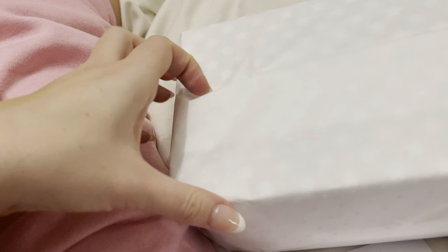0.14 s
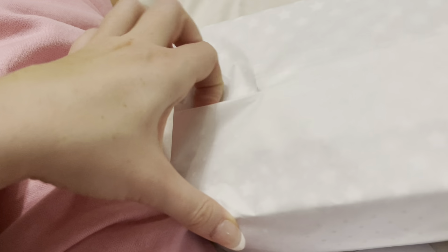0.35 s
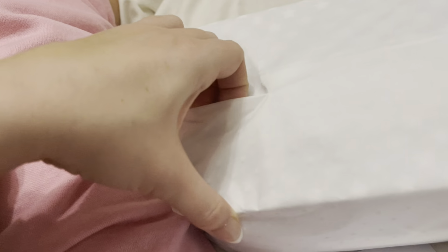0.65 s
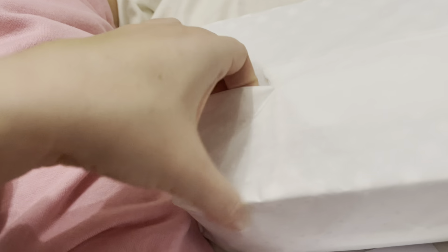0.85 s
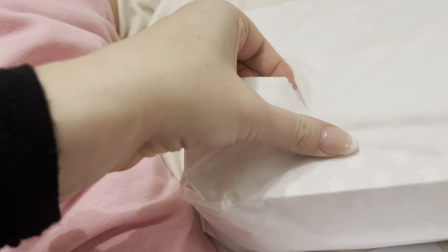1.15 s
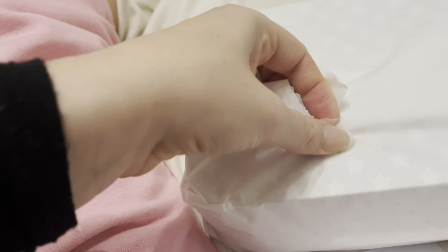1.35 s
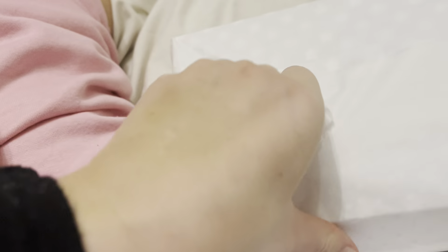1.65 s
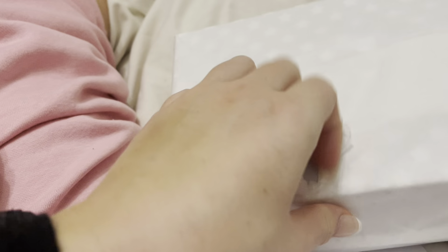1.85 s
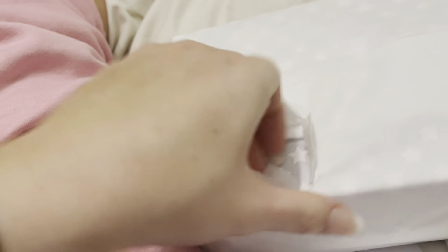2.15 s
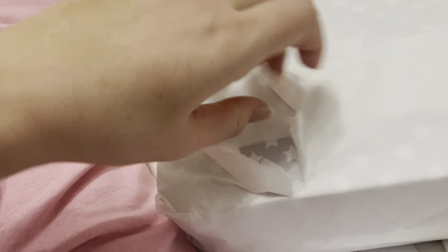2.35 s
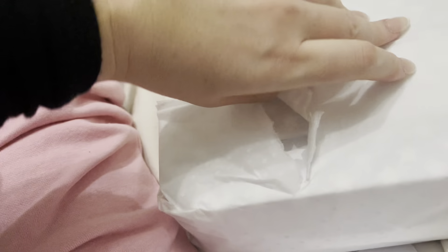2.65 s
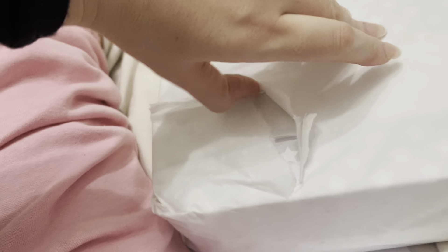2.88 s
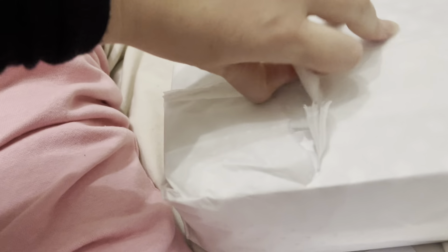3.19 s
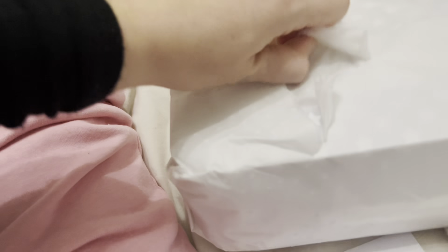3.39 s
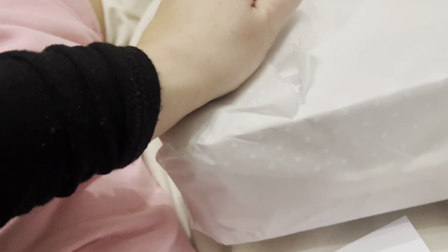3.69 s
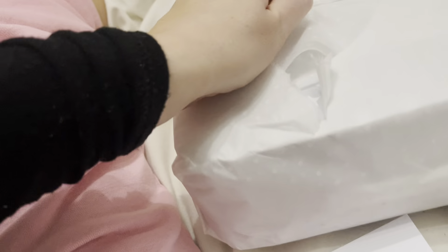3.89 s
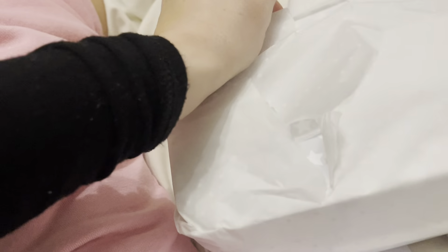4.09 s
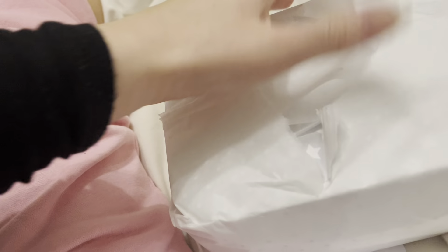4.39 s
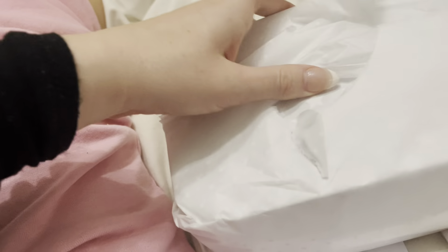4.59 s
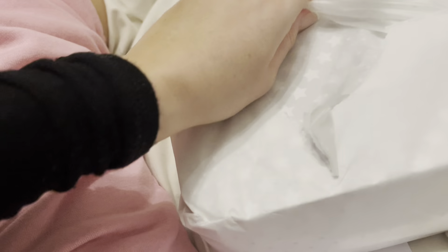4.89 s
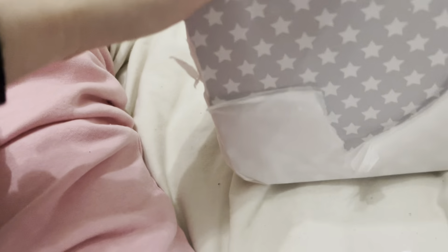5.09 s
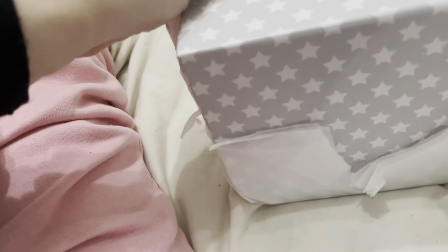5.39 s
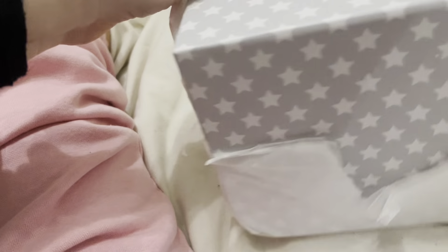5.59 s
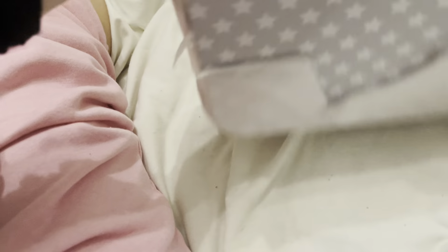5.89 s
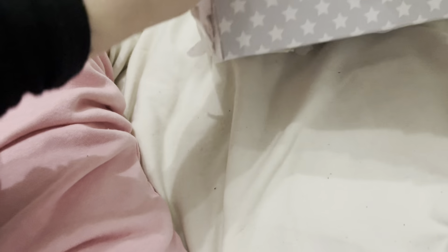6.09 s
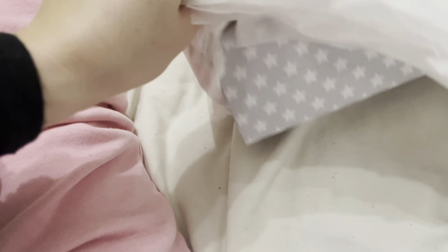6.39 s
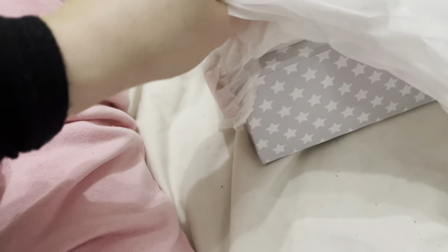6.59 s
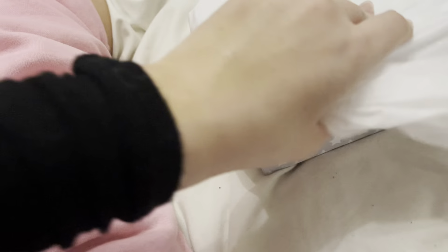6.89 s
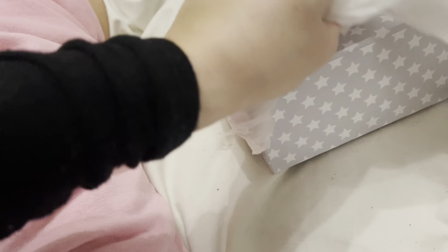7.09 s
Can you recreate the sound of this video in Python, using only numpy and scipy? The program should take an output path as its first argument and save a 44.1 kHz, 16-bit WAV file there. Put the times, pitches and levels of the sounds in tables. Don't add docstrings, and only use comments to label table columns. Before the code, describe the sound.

Very close to the microphone in a quiet, soft-furnished room, fingertips pinch thin, taut tissue paper with dry snaps and light taps on a hollow box. An edge tears in stronger bursts, then the whole hand rips the sheet and pulls it away in dense, rustling sweeps. Dull low thumps and bumps of the box on bedding continue underneath. Bright, crackly stereo, almost no echo.

```python
import sys
import numpy as np
from scipy import signal
from scipy.fft import rfft, irfft
from scipy.io import wavfile
from scipy.ndimage import uniform_filter1d

SR = 44100
rng = np.random.default_rng(int(sys.argv[2]) if len(sys.argv) > 2 else 0)


def gain_from_db(level_db):
    decades = np.asarray(level_db, float) / 20
    return 10 ** decades


def bounce(signal):
    frames = np.transpose(np.atleast_2d(signal))
    limited = np.clip(frames, -1, 1)
    pcm = np.round(limited * 32767).astype(np.int16)
    wavfile.write(sys.argv[1], SR, pcm)


N = 319725


def evened(x):
    return x / np.sqrt(np.mean(x ** 2) + 1e-20)


def read(points, hz):
    point_hz, value = np.transpose(points)
    return np.interp(np.log(hz + 1), np.log(point_hz + 1), value)


def follow(rows, s):
    times, *columns = np.transpose(rows)
    return [np.interp(s, times, column) for column in columns]


def slow(rate_hz):
    return evened(signal.lfilter(*signal.butter(2, rate_hz, fs=SR), rng.standard_normal(N)))


def colour(x, points):
    gain_db = np.maximum(read(points, np.fft.rfftfreq(4096, 1 / SR)), -100)
    log_gain = np.log(gain_from_db(gain_db))
    full = np.r_[log_gain, log_gain[-2:0:-1]]
    taps = np.fft.ifft(np.exp(full - 1j * signal.hilbert(full).imag)).real[:2048]
    return signal.oaconvolve(x, taps[None] / np.linalg.norm(taps), axes=1)[:, :N]


def ring(x, hz, width_hz):
    return signal.lfilter(*signal.iirpeak(hz, hz / width_hz, SR), x)


def resonate(x, hz, width_hz):
    turn = np.exp(2j * np.pi * np.cumsum(hz) / SR)
    r = np.exp(-np.pi * width_hz / SR)
    return 2 * (turn * signal.lfilter([1 - r], [1, -r], x / turn)).real


# frequency in Hz, level in dB per Hz.
ROOM_TONE_SPECTRUM = [(22, -25), (42, 0.5), (274, -3.5), (645, -12.5), (1440, -14), (1970, -25),
                      (4650, -20), (11300, -59.5), (15000, -67)]


def room_tone():
    return gain_from_db(-54) * colour(rng.standard_normal((2, N)), ROOM_TONE_SPECTRUM)


def room(x):
    t = np.arange(6000) / SR
    echoes = rng.choice([-1., 1.], (2, 6000)) * (rng.random((2, 6000)) < .05)
    taps = echoes * gain_from_db(-60 * t / 0.047) * (t > .003)
    taps = signal.lfilter(*signal.butter(1, 6000, fs=SR), taps)
    return signal.oaconvolve(x, taps / np.linalg.norm(taps[0]), axes=1)[:, :N]


# frequency in Hz, width in Hz, level in dB.
WALL_MODES = [(177.6, 110, -2.5), (370, 182, -2), (547, 196, -1)]
# time in seconds, drumming in dB, hollow note relative to it in dB,
# shifting on the bed in dB.
BOX_DRIVE = [
    (0, -15, 9, -24.5),
    (.85, -17.5, 12, -13.5),
    (1.9, -13, 7.5, -20),
    (2.5, -14, -2, -16),
    (3.1, -11.5, 0.5, -33),
    (3.7, -19, 3, -14.5),
    (4.2, -13, -13, -22),
    (4.5, -21, 5, -18),
    (5.5, -13.5, -29, -11.5),
    (7.25, -13, -0.5, -18),
]


def box(push):
    drum_db, hollow_db, shift_db = follow(BOX_DRIVE, np.arange(N) / SR)
    walls = 0
    for k, (hz, width_hz, db) in enumerate(WALL_MODES):
        walls = walls + (-1) ** k * gain_from_db(db) * ring(ring(push, hz, 1.16 * width_hz), hz, 1.2 * width_hz)
    hollow = ring(ring(push, 234.0, 66), 234.0, 66)
    weight = np.sign(push) * abs(push) ** 0.56
    thud = ring(ring(weight * gain_from_db(4.3 * slow(11.0)), 110, 180), 110, 180)
    return gain_from_db(drum_db - 12.0) * (walls + gain_from_db(hollow_db) * hollow) + gain_from_db(shift_db - 5.0) * thud


# time in seconds, peak in dB, length in ms.
LID_TAPS = [(0.083, -35.5, 24), (0.19, -26, 4.3), (0.294, -27, 13), (0.523, -32, 17), (.657, -33.5, 33),
            (1.003, -24.5, 22), (1.047, -22, 15), (1.099, -23, 16), (1.168, -21, 13.5), (1.195, -19, 15.5),
            (1.237, -24.5, 19), (1.296, -34, 69), (1.463, -28.5, 18), (1.492, -33, 17), (1.623, -22.5, 14),
            (1.771, -33, 17), (2.001, -38, 59), (2.333, -23.5, 4.7), (2.393, -28.5, 24), (2.433, -35, 22),
            (2.462, -32, 20), (2.483, -32, 22), (2.505, -32, 35), (2.554, -31, 18), (2.599, -34.5, 15),
            (2.663, -36, 19), (2.806, -33.5, 45), (2.932, -35.5, 20)]
# time in seconds, peak in dB, pitch in Hz, length in ms.
BOX_BUMPS = [(.506, -32.5, 725, 4.9), (1.878, -38.5, 450, 57), (1.896, -38.5, 1130, 18),
             (2.015, -41, 1110, 16), (2.175, -35, 457, 18), (2.25, -41, 604, 26), (2.53, -44, 517, 21),
             (2.81, -39, 551, 60), (3.308, -27, 272, 24), (4.169, -44, 668, 88), (4.207, -38.5, 470, 37),
             (4.535, -25, 274, 19), (4.656, -26, 257, 31), (4.747, -24.5, 203, 33), (4.802, -27, 252, 17),
             (4.927, -26, 432, 22), (5.128, -30.5, 254, 22), (5.19, -27.5, 1200, 10),
             (5.291, -23.5, 242, 23), (5.444, -30, 227, 13), (5.694, -30.5, 376, 38), (6.271, -25, 370, 21),
             (6.92, -37, 270, 34), (7.137, -26.5, 280, 5.4), (7.196, -23.5, 286, 8.3)]
TAP_HZ, TAP_SAG_HZ_PER_DB, TAP_SOFT_DB = 251.5, 2.5, -34


def thumps():
    t = np.arange(4000) / SR
    out = np.zeros((2, N + 4000))
    taps = [(s, db, TAP_HZ - TAP_SAG_HZ_PER_DB * (db - TAP_SOFT_DB), ms) for s, db, ms in LID_TAPS]
    rows = taps + BOX_BUMPS
    for (s, db, hz, length_ms), noise in zip(rows, rng.standard_normal((len(rows), 2, 4000))):
        u = t * 1000 / (0.31 * length_ms)
        at = round((s - .002) * SR)
        tone = np.sin(2 * np.pi * hz * t + 3 * noise[:, :1]) * (u * np.exp(1 - u)) ** 2.76
        scuff = ring(noise, 413, 173) * np.sqrt(length_ms / 15) * np.sqrt(u) * np.exp(-u / 1.22)
        out[:, at:at + 4000] += gain_from_db(db + 5.0) * (tone + 5.76 * scuff)
    return out[:, :N]


# frequency in Hz, level in dB.
FINE_SPECTRUM = [(4000, -44), (6200, -23.5), (7500, -5), (9000, -3), (10000, -1), (10650, 3), (11300, -0.5),
                 (12000, -10.5), (13000, -14.5), (13700, -25), (15200, -23)]


def crisp(fine):
    return colour(fine, FINE_SPECTRUM)


# frequency in Hz, level in dB.
FOLD_SPECTRUM = [(400, -16.5), (780, -7.5), (1150, -1.5), (1550, -6), (2000, -4.5), (2450, -2), (3100, -1),
                 (4500, -2.5), (5600, 1), (7000, -1), (9000, -55.5)]


def papery(broad):
    return colour(broad, FOLD_SPECTRUM)


GRAIN = 900


def creases(length_ms, hz, facet):
    noise = rng.standard_normal((len(hz), 2, 2, GRAIN))
    stutter = evened(uniform_filter1d(noise[:, :1, :1, ::-1], size=45))
    noise = noise * gain_from_db(4.0 * stutter)
    u = np.arange(GRAIN) / SR * 1000 / length_ms[:, None, None]
    fine = noise[:, 0] * np.exp(-(u / 1.07) ** 0.99) * (1 - np.exp(-u / 0.31))
    broad = noise[:, 1] * np.exp(-(u / 1.48) ** 1.23) * (1 - np.exp(-u / 0.41))
    small_hz = rng.uniform(5960, 13560, len(hz))
    small_facets = np.array([ring(a, f, f / 4) for a, f in zip(fine, small_hz)])
    large_facets = np.array([ring(b, f, f / 3.5) for b, f in zip(broad, hz)])
    return .8 * fine + small_facets, .4 * broad + facet * large_facets


def swarm(per_s, spread_db, clump_db, clump_hz, length_ms):
    lengths_ms = length_ms * 3.5 ** rng.random(12)
    fold_hz = rng.permutation(np.geomspace(900, 6200, num=12))
    shapes = creases(lengths_ms, fold_hz, facet=0.95)
    clumps = slow(clump_hz)
    clumps = evened(clumps - uniform_filter1d(clumps, size=2500))
    size_db = spread_db * rng.exponential(1, N) + clump_db * clumps
    size = gain_from_db(np.minimum(size_db, 11))
    clicks = size * (rng.random(N) < per_s / SR) * rng.choice([-1., 1.], (2, N))
    kind = rng.integers(0, 12, N)
    sums = []
    for shape in shapes:
        sums.append(sum(signal.oaconvolve(clicks * (kind == k), burst, axes=1)[:, :N]
                        for k, burst in enumerate(shape)))
    return [evened(x) for x in (*sums, clicks)]


# peak time in seconds,
# crumpling in dB, swell in ms, release in ms.
HAND_STROKES = [(0.0, -51, 12, 120), (.1, -36, 45, 104), (.18, -35.5, 55, 350), (0.288, -31.5, 130, 270),
                (.479, -34, 155, 184), (0.652, -33.5, 156, 115), (0.702, -38, 22, 580),
                (1.046, -35, 410, 410), (1.133, -25, 64, 84), (1.201, -28.5, 64, 54),
                (1.245, -33, 140, 320), (1.42, -40.5, 190, 175), (1.539, -34.5, 60, 100),
                (1.628, -17.5, 84, 106), (1.8, -38.5, 280, 530), (2.119, -33, 136, 260),
                (2.249, -37, 49, 270), (2.323, -34.5, 390, 81), (2.527, -33.5, 330, 94),
                (2.662, -37, 150, 440), (2.785, -34, 28, 160), (2.941, -39, 160, 630),
                (3.14, -25.5, 17, 176), (3.204, -27.5, 210, 33), (3.335, -20, 150, 93),
                (3.445, -30, 120, 270), (3.499, -21.5, 42, 112), (3.57, -32.5, 54, 220),
                (3.7, -38, 1300, 91), (3.799, -38, 80, 630), (3.852, -30, 62, 41), (3.98, -20, 65, 170),
                (4.024, -20, 182, 116), (4.213, -36.5, 69, 210), (4.42, -39, 190, 220),
                (4.548, -20.5, 103, 64), (4.658, -19, 52, 170), (4.69, -21, 80, 70), (4.773, -19, 117, 56),
                (4.82, -23.5, 86, 69), (4.951, -26.5, 1200, 19), (4.992, -29, 30, 110),
                (5.125, -27.5, 226, 850), (5.301, -27.5, 220, 340), (5.444, -32, 250, 140),
                (5.574, -32, 130, 74), (5.624, -27.5, 12, 300), (5.695, -25, 210, 75),
                (5.755, -36, 100, 63), (5.951, -36.5, 65, 470), (6.081, -30, 320, 65),
                (6.274, -25, 204, 210), (6.441, -21, 235, 96), (6.7, -33.5, 420, 2000),
                (6.914, -25.5, 270, 370), (7.116, -26, 430, 290)]
REST_DB = -54


def hand(t):
    pull = np.full(len(t), 10 ** (REST_DB / 50))
    for s, db, swell_ms, release_ms in HAND_STROKES:
        shape = np.interp(t, [s - swell_ms / 1000, s, s + release_ms / 1000], [0, 1, 0])
        pull = np.maximum(pull, 10 ** (db / 50) * shape)
    return 50 * np.log10(pull)


# time in seconds, pitch of its broad folds in Hz,
# broad folds relative level in dB, crackle share 0-1.
SHEET_IN_PLAY = [(0, 5130, -1, 0.76), (.8, 4300, 2, 0.91), (1.1, 3100, 1.5, 0.85), (1.65, 3160, -2, 0.8),
                 (1.95, 2680, -3.5, 0.23), (2.45, 5030, -1.5, 0.81), (3.15, 4770, -5, 0.94),
                 (3.5, 2800, -2, 0.86), (4.0, 3700, 0, 0.58), (4.3, 3600, -1.5, 0.77),
                 (4.9, 3580, -2.5, 0.55), (5.15, 1220, -2.5, 0.49), (5.82, 1190, -1.5, 0.55),
                 (6.2, 3600, 1, 0.26), (6.43, 3080, -2, 0.4), (6.65, 2230, -1, 0.3), (7.25, 2140, -1, 0.67)]


def rustle():
    t = np.arange(N) / SR
    work_db = hand(t)
    fold_hz, fold_db, share = follow(SHEET_IN_PLAY, t)
    share = np.clip(share, 0, 1)
    crackle = swarm(per_s=700, spread_db=3.0, clump_db=4.5, clump_hz=60.5, length_ms=0.5)
    hiss = swarm(per_s=5000, spread_db=-0.5, clump_db=1.06, clump_hz=44, length_ms=0.32)
    fine, broad, push = (share * a + np.sqrt(1 - share ** 2) * b for a, b in zip(crackle, hiss))
    broad = broad + .9 * resonate(broad, fold_hz * 1.18 ** slow(7), 1300)
    taut = np.clip((fold_hz - 2200) / 4500, 0, 1)
    broad = broad - taut * signal.lfilter(*signal.butter(1, 1800, fs=SR), broad)
    push_gain = gain_from_db(0.79 * (work_db + 37.5))
    return gain_from_db(work_db + 6.0) * fine, gain_from_db(work_db + fold_db) * broad, push_gain * push


# time
# in seconds, peak in dB, broad folds relative level in dB, fold pitch in Hz, length in ms.
CRACKS = [(0.0076, -27.5, -3.5, 4740, 3.9), (0.083, -11, -8, 3520, 2.7),
          (0.113, -10, -7.5, 4870, 2.5), (0.1437, -13.5, -9, 6120, 0.66),
          (0.161, -15, -13, 5250, 2.6), (0.1695, -8, -15, 4930, 2.7), (0.187, -3, -10.5, 4200, 1.06),
          (0.198, -14, -4, 5160, 2), (0.2227, -16, -4, 5000, 3.5), (0.24, -8, -8, 5040, 1.9),
          (0.256, -7.5, -12, 5060, 4.4), (0.29, -11, -3.5, 6480, 3.9), (0.318, -6.5, -9, 6160, 8),
          (0.3409, -9.5, -5.5, 4970, 6.7), (0.3728, -13.5, -2, 4740, 0.98),
          (0.374, -11.5, -6.5, 6480, 2.5), (0.407, -19, -7, 4240, 1.5), (0.5216, -15.5, 0, 5060, 2.2),
          (0.5626, -18, -7, 3230, 1.7), (0.5929, -18.5, 0.5, 4240, 3), (0.599, -16.5, 1, 5060, 1),
          (0.6378, -13, -3, 4010, 0.83), (0.6545, -4.5, -5.5, 4530, 4.6),
          (0.729, -8.5, -5.5, 4900, 1.16), (0.7806, -19, 9.5, 5030, 0.47),
          (0.8282, -19, -12, 5380, 1.9), (0.8377, -15, -12, 5660, 1), (0.8765, -14.5, -5, 4870, 1.05),
          (0.9435, -8.5, -7.5, 2970, 0.73), (0.949, -15, -10, 2710, 2.7),
          (0.996, -2.5, 0, 3100, 1.4), (1.0005, -4, -10, 4000, 1.8), (1.0453, -2.5, -1, 3120, 3.2),
               (1.0717, -21, 5, 3430, 1), (1.1017, -6.5, -3, 3060, 2.8), (1.137, -7, 1, 3050, 3),
               (1.193, -1.5, -10, 5800, 4.1), (1.2026, -8, -19, 5940, 2.2), (1.24, 0.5, -12, 4820, 2.2),
               (1.379, -16, -9, 6480, 1.7), (1.4051, -16, -22, 6480, 4.3), (1.4221, -13, -3, 4330, 1.7),
               (1.433, -14.5, -8, 3600, 1.5), (1.5963, -2, -4, 4130, 4.4), (1.6225, -7.5, 1, 1950, 3.9),
               (1.7828, -10, -13.5, 2650, 1.4), (1.8149, -12, -21, 3680, 2.2), (1.871, -14, -20, 3660, 1.2),
               (1.8893, -4.5, -17, 3810, 0.7), (1.997, -24, -10, 900, 1.3), (2.062, -18, -12.0, 6140, 1.1),
               (2.0677, -15.5, -13, 5340, 0.62), (2.095, -10, -13, 5990, 2.8),
               (2.1246, -13, -6.5, 5620, 5.4), (2.162, -9, -9.0, 4310, 1.8), (2.177, -6, -13, 5450, 1.8),
               (2.2508, -10.5, -8, 900, 1.6), (2.3115, -10, -4.5, 5200, 1.5),
               (2.3873, -16.5, -7, 2870, 3.6), (2.448, -11, -29, 4740, 1.4), (2.512, -6.5, -27, 5300, 1.7),
               (2.531, -13, -19, 6480, 1.4), (2.6566, -9.5, -10, 5340, 8.3), (2.7876, -22, -0.5, 4370, 1.6),
          (2.978, -16.5, -7, 5730, 0.99), (2.9892, -15, -21, 6460, 1), (3.016, -19, -14, 5940, 1.5),
              (3.023, -15.5, -11, 4460, 2), (3.0697, -18, -16, 5600, 1.5), (3.0749, -13, -14, 5250, 0.63),
              (3.128, -1, -16.5, 3900, 1.1), (3.1382, -8, -23, 5000, 1), (3.164, -1, -19, 4430, 1.8),
              (3.1858, -0.5, -18, 4000, 0.52), (3.2759, -4.5, -12, 5100, 1.9), (3.2797, -11, -9, 5530, 2.2),
              (3.3088, 0, -9.5, 3900, 5.8), (3.3291, -10, -8, 3860, 1), (3.3498, -3, -3.5, 3700, 2.55),
              (3.3666, -3, -12.5, 4480, 1.28), (3.411, -11.5, -10.5, 2820, 1.3), (3.5, -1, -10, 3730, 2.1),
              (3.6826, -17, -15, 4260, 2.2), (3.7078, -22, -9, 970, 5), (3.7188, -16, -5, 3780, 0.88),
              (3.7784, -13, -7.0, 1750, 0.72), (3.8468, -13, -17, 6400, 3.2),
              (3.9044, -8.5, -6.5, 2770, 1.6), (3.9105, -6, -4.5, 2050, 0.62), (3.9738, -4, -5, 3820, 4.8),
              (4.0014, 1, -4, 2230, 2.3), (4.163, -19, -7.5, 5750, 2.3), (4.1998, -16, -14.0, 5200, 2.2),
              (4.2135, -19, -4, 1990, 1.8), (4.263, -19.5, -0.5, 2460, 4.2), (4.314, -14, -15, 2710, 1.4),
              (4.3382, -15, -7, 1910, 1.14), (4.387, -23, -6, 3000, 1), (4.4251, -14.5, -20.5, 4260, 1.1),
              (4.453, -13.5, -9, 5710, 10),
          (4.5422, -8, -12, 2960, 2.2), (4.5566, -1.5, -14, 2120, 1.54), (4.6385, -20, -14.5, 3800, 1),
               (4.6518, -4, -16, 3830, 0.77), (4.695, -13, -4, 3660, 1.7), (4.7811, -3.5, -9, 4040, 2.5),
               (4.8505, -8.5, -9, 2730, 1.4), (4.896, -6, -7, 3770, 1.2), (4.931, -2, -7, 3730, 1.5),
               (4.9418, -8, -1.5, 3830, 2.8), (4.993, -22, -1, 4410, 1.3), (5.0064, -20, -12, 3000, 1),
               (5.0463, -18.5, -11, 1080, 2.1), (5.1206, -12, -7, 5990, 3.1), (5.2224, -9, -13, 5840, 2.1),
               (5.291, -3, -8, 1090, 1.2), (5.3713, -9.5, -10, 3140, 1.7), (5.385, -16, -7, 3190, 0.8),
               (5.447, -14.5, 0, 3240, 1.6), (5.4928, -13.5, -11, 4940, 2), (5.5004, -5, -33, 6480, 0.8),
               (5.6225, -1, -12, 5230, 1.94), (5.696, -14, 2, 1850, 1.8), (5.735, -23.5, 7, 2000, 0.87),
               (5.7627, -14, -13, 6380, 2.7), (5.8006, -22, -11, 6540, 0.74),
               (5.8125, -15.5, -11, 6740, 0.42), (5.862, -21.5, -15, 5340, 1.4),
               (6.1535, -19, 0, 6500, 0.87), (6.2703, -0.5, -7.5, 1960, 1.9), (6.2947, -3, -22, 3420, 1.5),
               (6.32, -11, -9, 3500, 3), (6.385, -9, -14, 3000, 1.1), (6.524, -17, -8, 5560, 1.8),
               (6.809, -12.5, -9, 1460, 2.3), (6.924, -6, -10, 2460, 1.6), (7.013, -13, -5, 4930, 1.4),
               (7.0674, -2.5, -9, 3340, 1.2), (7.1954, -15.5, 1, 1980, 2.6)]


def snaps():
    rows = CRACKS
    s, db, fold_db, hz, length_ms = np.transpose(rows)
    fine, broad = creases(np.clip(1.23 * length_ms, .4, 12), hz, facet=1.4)
    starts = np.round((s - length_ms / 6000) * SR).astype(int)
    out = np.zeros((2, N + 2 * GRAIN))
    for part, radiate, peak_db in ((fine, crisp, db + 2.0), (broad, papery, db + fold_db + 2.0)):
        heard = radiate(part.reshape(-1, GRAIN))[:, :2 * GRAIN].reshape(len(s), 2, -1)
        heard = heard * (gain_from_db(peak_db) / abs(heard[:, 0]).max(1))[:, None, None]
        for k, at in enumerate(starts):
            out[:, at:at + 2 * GRAIN] += heard[k]
    return out[:, :N]


# frequency in Hz, likeness 0-1.
PORT_LIKENESS = [(300, .985), (780, .8), (1100, .94), (1550, .58), (1950, .86), (2900, .35), (3900, .72),
                 (5000, .25), (6500, .68), (7100, .52), (8400, .96), (10300, .99), (12200, .96),
                 (13000, .72)]
# frequency in Hz, lead of the left port in radians.
PORT_LEAD = [(100, 0), (1300, .35), (1700, -.4), (2600, 2.0), (3800, 0), (5200, 1.3), (6500, 0),
             (7400, 1.3), (8600, 0), (10250, -3.14), (12000, -6.3), (13300, -9.2), (15100, -12.5)]
# frequency in Hz, left over right in dB.
PORT_BALANCE = [(300, 1.9), (550, 4), (1400, 3.7), (2200, 0.64), (3300, 5.6), (4500, 0.29), (7000, 3.6),
                (9500, 0.1)]


def ports(pair):
    hz = np.fft.rfftfreq(N, 1 / SR)
    first, second = rfft(pair)
    same = np.clip(read(PORT_LIKENESS, hz), 0, 1)
    shifted = first * np.exp(-1j * read(PORT_LEAD, hz))
    right = (same * shifted + np.sqrt(1 - same ** 2) * second) / gain_from_db(read(PORT_BALANCE, hz))
    return np.array([pair[0], irfft(right, N)])


def scene():
    fine, broad, push = rustle()
    near = crisp(fine) + papery(broad) + box(push) + snaps() + thumps()
    return ports(near + gain_from_db(-18.5) * room(near) + room_tone())


def band_limit(x):
    return signal.sosfilt(signal.butter(12, 17040, fs=SR, output="sos"), x)


def record(dry):
    held = signal.oaconvolve(np.tanh(0.57 * dry), signal.firwin(255, 15900, fs=SR)[None], "same")
    hz, _, z = signal.stft(held, SR, nperseg=1024)
    power = uniform_filter1d((held ** 2).mean(0), 40)
    padded = np.pad(power, (512, 1024))
    frames = np.lib.stride_tricks.sliding_window_view(padded, 1024)[::512][:z.shape[-1]]
    level_db = 10 * np.log10(abs(frames.mean(1)) + 1e-14)
    crest_db = uniform_filter1d(10 * np.log10(frames.max(1) + 1e-14) - level_db, size=3)
    top = hz > 13100
    need_db = 7.0 + 0.035 * (level_db + 25.0) + 1.0 * (hz[top, None] < 14300)
    z[:, top] *= np.clip((crest_db - need_db) / 0.45, 0, 1)
    finished = signal.istft(z, SR, nperseg=1024)[1][:, :N]
    return band_limit(finished)


dry = scene()
out = record(dry)
bounce(out)
```